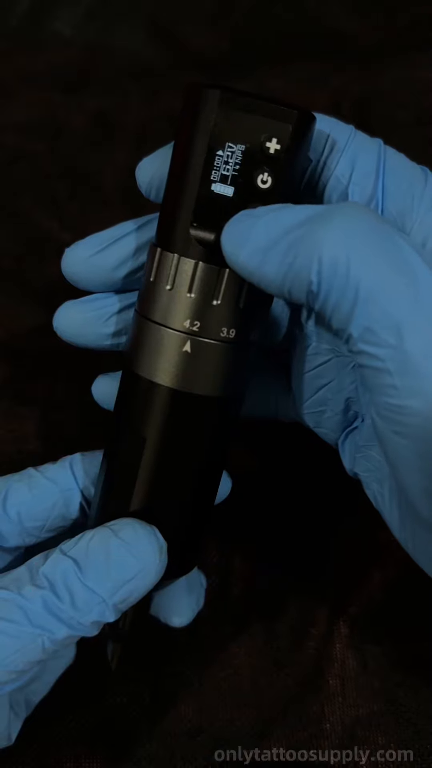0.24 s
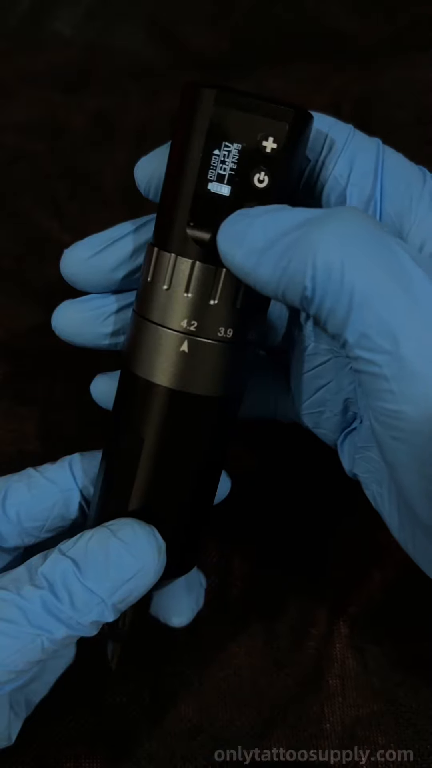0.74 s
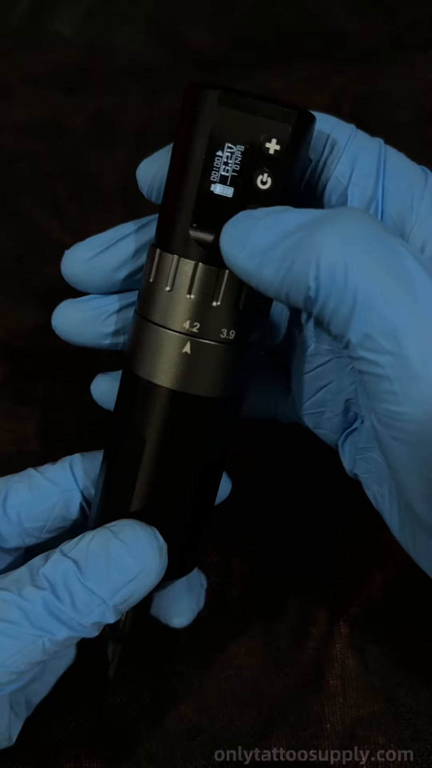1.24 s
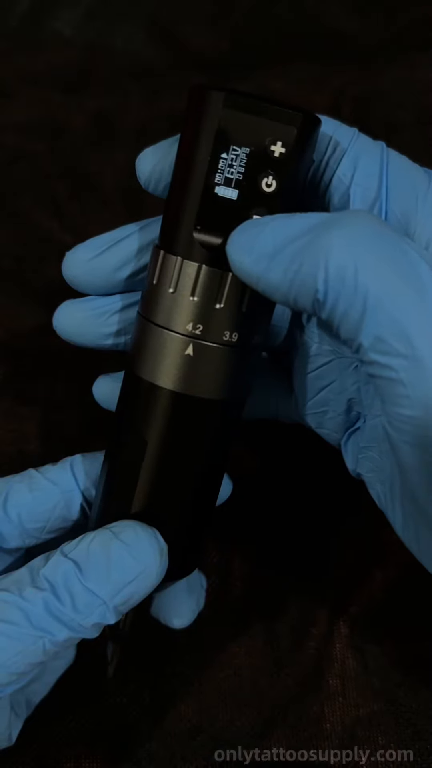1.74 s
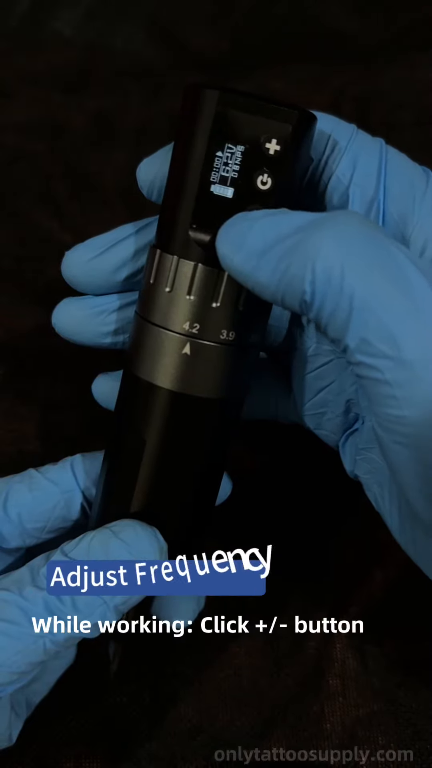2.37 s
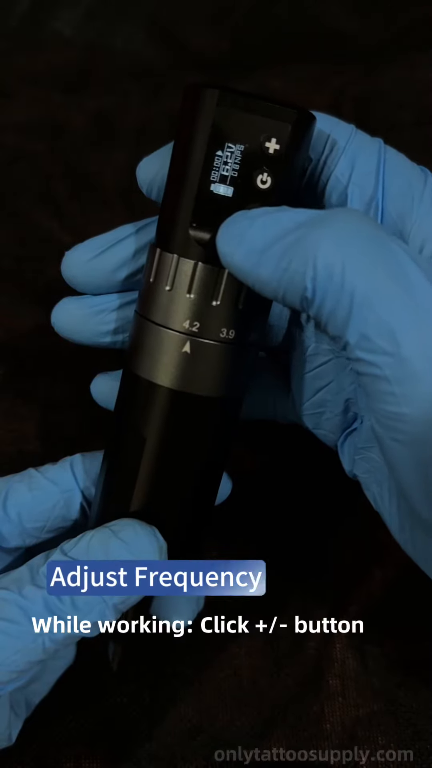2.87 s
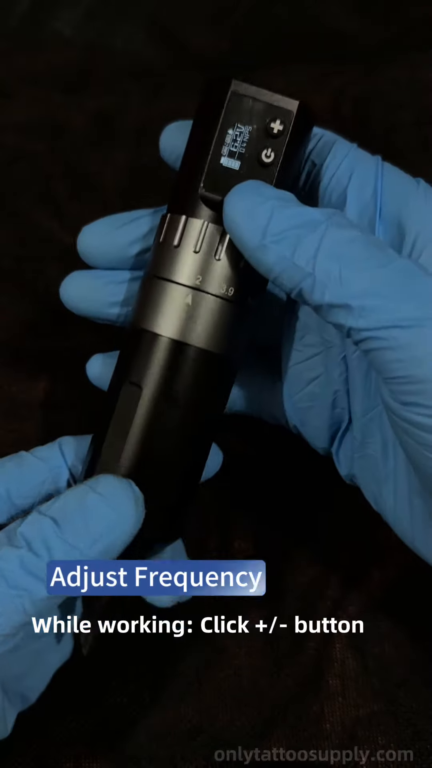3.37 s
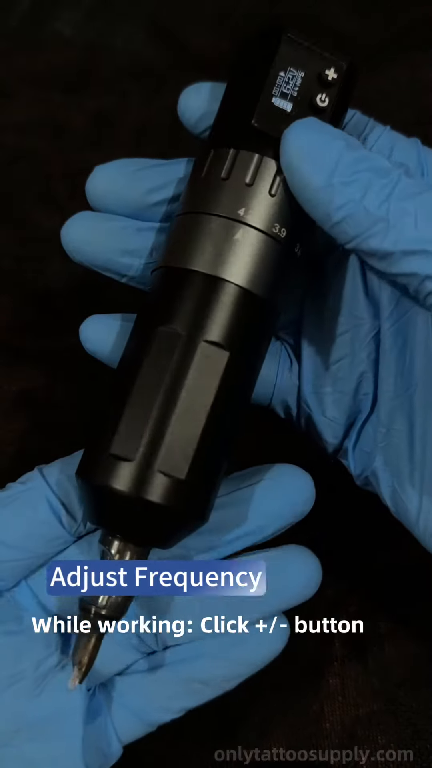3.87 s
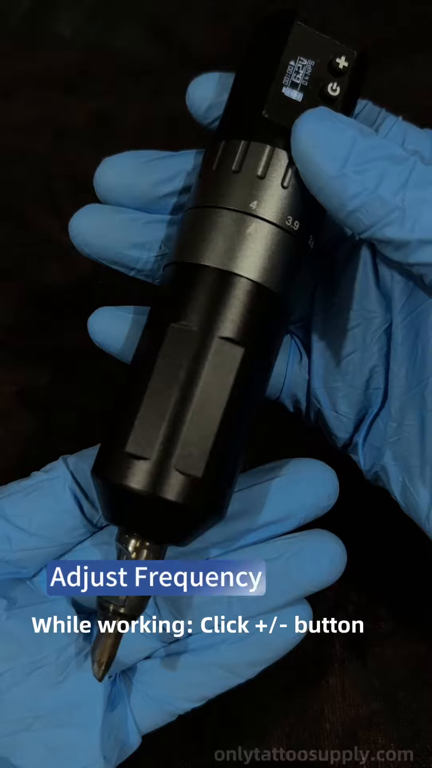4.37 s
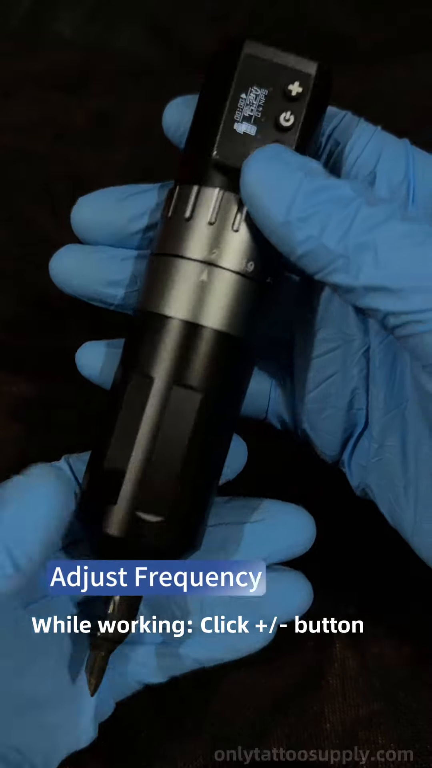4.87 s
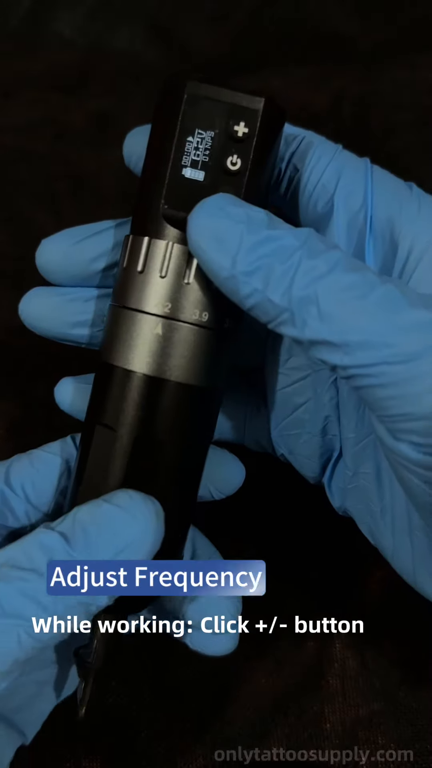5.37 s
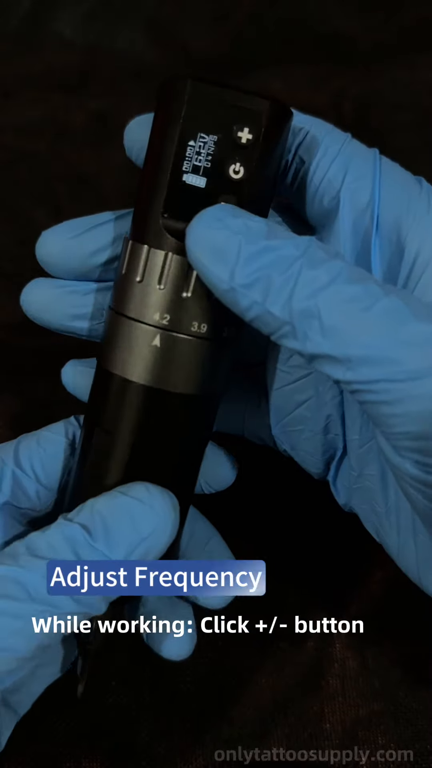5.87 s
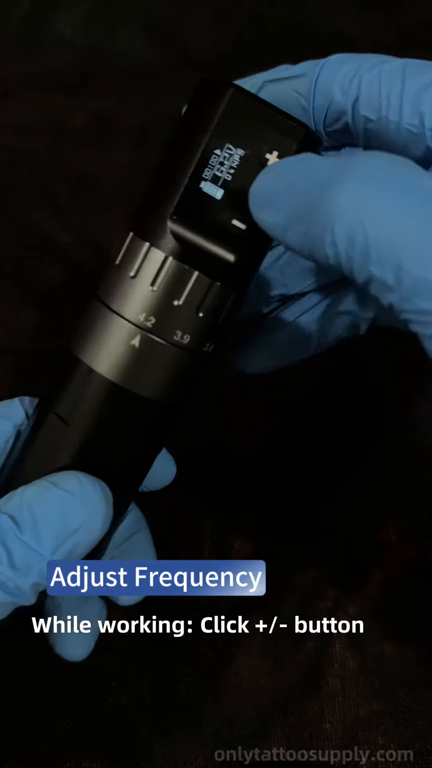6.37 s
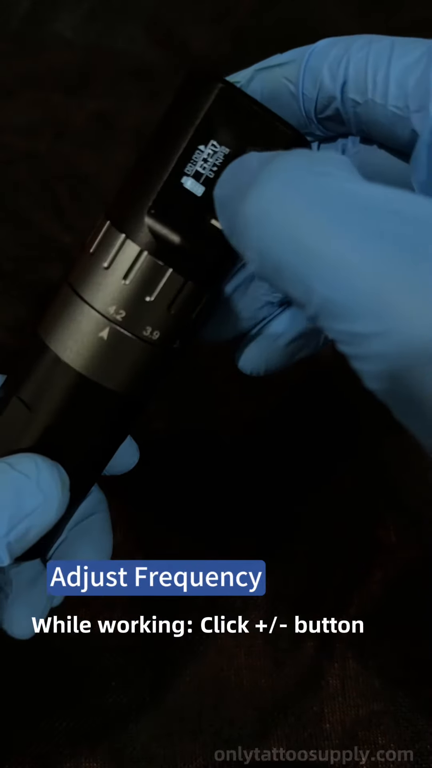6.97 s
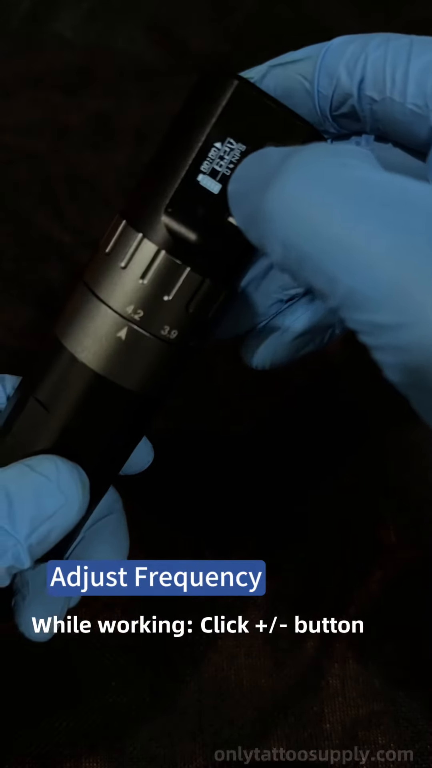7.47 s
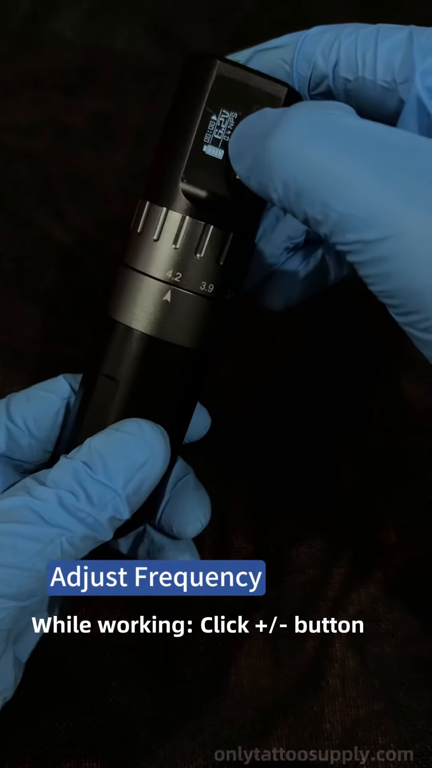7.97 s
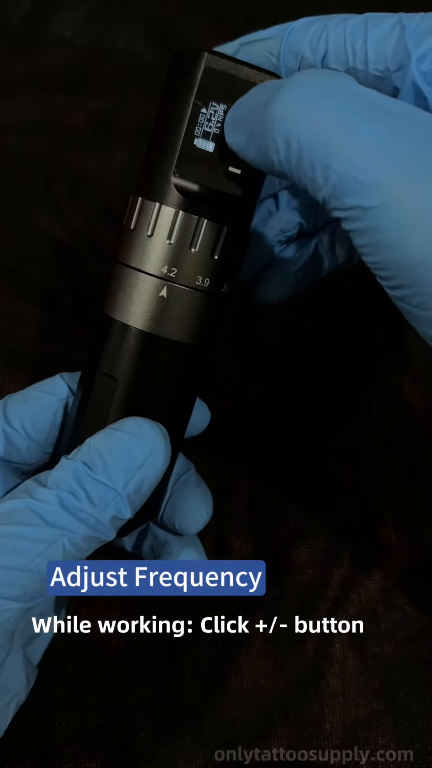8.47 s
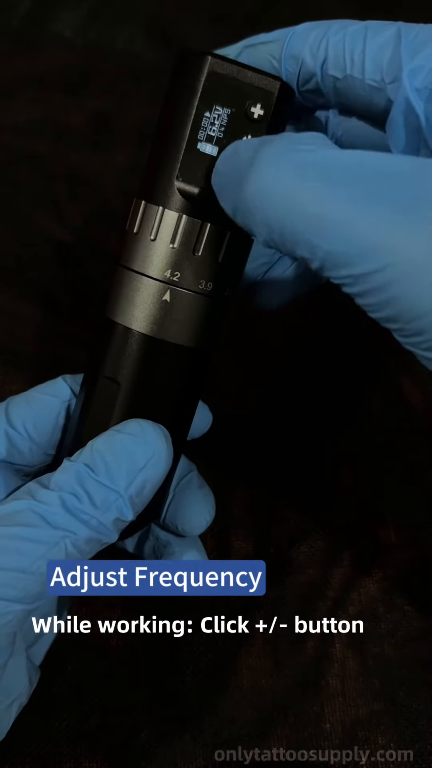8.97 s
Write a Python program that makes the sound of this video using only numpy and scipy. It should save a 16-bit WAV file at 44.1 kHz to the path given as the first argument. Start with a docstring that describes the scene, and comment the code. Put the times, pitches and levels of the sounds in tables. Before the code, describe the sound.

A small handheld motor pen buzzes in short, even quarter-second bursts, with tiny button clicks and rubber glove rustles over a faint low hum.

```python
"""A handheld rotary pen machine runs in short bursts close to the microphone; its motor turns a cam.
Each shaft turn drives the needle bar down and up, so its parts knock a few times a turn in a metal shell.
Gloved hands turn it: rubber slides as grainy noise, creases snap and its button clicks as damped sines.
A small room answers as a decaying noise tail; ventilation behind is two low hums and dull air noise."""
import sys
import numpy as np
from scipy import signal
from scipy.fft import rfft, irfft
from scipy.io import wavfile
from scipy.ndimage import map_coordinates

SR = 44100
rng = np.random.default_rng(int(sys.argv[2]) if len(sys.argv) > 2 else 0)


def attenuation_scalar(level_db):
    """Turn a level in dB into a linear amplitude multiplier (20 dB per decade)."""
    decades = np.asarray(level_db, float) / 20
    return 10 ** decades


def master_out(mix):
    """Clip the mix to full scale and print it as 16-bit PCM to the path in sys.argv[1]."""
    frames = np.transpose(np.atleast_2d(mix))
    ceiling = np.clip(frames, -1, 1)
    pcm = np.round(ceiling * 32767).astype(np.int16)
    wavfile.write(sys.argv[1], SR, pcm)


N = 407033
TIME = np.arange(N) / SR
SHAFT_HZ = 78.69  # shaft speed while the motor runs steadily


def unit(x):
    """Scales a signal to rms 1."""
    return x / np.sqrt(np.mean(x ** 2) + 1e-20)


def along(points, hz):
    """Reads (f/Hz, value) points on a log frequency axis."""
    f, value = np.transpose(points)
    return np.interp(np.log(hz + 1), np.log(f + 1), value)


def curves(rows):
    """Gives one value per sample for each column after the time."""
    s, *columns = np.transpose(rows)
    return [np.interp(TIME, s, column) for column in columns]


def wobble(rate):
    """A smooth random curve with rate knots a second."""
    knots = rng.standard_normal(int(N / SR * 60) + 4)
    return map_coordinates(knots, [TIME * np.clip(rate, 0, 59)])


def coloured(x, colour_db, size=2048):
    """Sends x through the minimum-phase filter of a colour (dB as a function of Hz), of energy 1."""
    cepstrum = irfft(np.log(attenuation_scalar(colour_db(np.fft.rfftfreq(size, 1 / SR))) + 1e-6))
    # folding the cepstrum forward in time makes the filter causal
    cepstrum[1:size // 2] *= 2
    cepstrum[size // 2 + 1:] = 0
    response = irfft(np.exp(rfft(cepstrum)))
    return signal.fftconvolve(x, response / np.linalg.norm(response))[:len(x)]


def ring(modes, seconds):
    """Sums the damped sines of a table of modes."""
    t = np.arange(int(seconds * SR)) / SR
    return sum(attenuation_scalar(db - 60 * t / t60) * np.sin(2 * np.pi * hz * t) for hz, db, t60 in modes)


def add(track, s, sound):
    """Mixes a sound in at time s, cut at the end of the track."""
    part = track[round(s * SR):][:len(sound)]
    part += sound[:len(part)]


# five ways the pen faces the microphone, each: shake level/dB, barrel gain/dB,
# barrel colour [f/Hz, level/dB per Hz], needle tube colour [f/Hz, level/dB per Hz]
POSE_LOWERED = (-59.5, -4.5, [(530, -38), (900, -17.5), (991, -9), (1080, -17), (1420, -19), (1590, -5),
                (2140, 1.5), (3040, -5.5), (3500, -0.5), (5300, -11), (6890, -47), (11700, -120)],
                [(3120, -33), (5300, -12.5), (6050, -12), (6390, -1), (7170, -8.5), (8840, -4), (9470, 1),
                (9820, -6.5), (10100, -9), (10900, -16.5), (12900, -11), (15800, -16)])
POSE_TIP_SHOWN = (-61, -9.5, [(530, -33), (900, -26), (962, -15), (1340, -20), (1610, -2), (1730, -9),
                  (3520, -9), (3820, -17), (4400, -3), (5300, -21), (6890, -43), (11700, -120)],
                  [(3120, -35), (5300, -22), (5570, -21.5), (6330, -12), (7500, -10.5), (9300, 1.5),
                  (9820, -3.5), (10400, -17.5), (11400, -26.5), (12300, -16), (12900, -8), (15800, -26)])
POSE_UPRIGHT = (-53, -2.25, [(530, -47.5), (900, -23), (999, -8.5), (1080, -21), (1280, -17.5), (1860, 0.5),
                (2340, -4.5), (2580, -2.5), (4640, -6.5), (5300, -18), (6890, -40.5), (11700, -120)],
                [(3120, -37.5), (5300, -7.5), (6690, -9.5), (7850, 1.5), (8450, -0.5), (9690, -2.5),
                (10600, -4.5), (11100, -15), (12800, -7), (13700, -11), (14200, -8.5), (14800, -6),
                (15800, -6.5)])
POSE_LEANING = (-64, -4.5, [(530, -46), (900, -38), (999, -24), (1480, -14.5), (2130, 3), (3020, -8),
                (3770, -3.5), (4240, -19.5), (4780, -0.5), (5300, -12.5), (6890, -35), (11700, -120)],
                [(3120, -27), (5300, -12.5), (5860, -5.5), (7100, -19), (7640, -5), (9380, 0.5), (9870, -4),
                (10200, -13), (11000, -20), (12600, -12), (15200, -17), (15800, -19)])
POSE_TURNED = (-60, -1.7, [(530, -44), (900, -23), (1030, -16), (1480, -22), (1610, -9.5), (2190, 0),
               (2640, -8), (3500, -2.5), (4150, -8.5), (5300, -10), (6890, -42), (11700, -120)],
               [(3120, -33), (5300, -16), (5830, -11.5), (6810, -2.5), (7430, -13), (8000, -2),
               (8680, -8.5), (9430, 4.5), (9870, -11), (11100, -20.5), (12900, -4), (14000, -11),
               (15000, -10), (15800, -8.5)])


def posed(pose):
    """Turning the pen changes its levels and colours: blends the two poses next to a place in the row."""
    poses = [POSE_LOWERED, POSE_TIP_SHOWN, POSE_UPRIGHT, POSE_LEANING, POSE_TURNED]
    place = np.clip(pose, 0, len(poses) - 1)
    shares = np.clip(1 - abs(place - np.arange(len(poses))), 0, 1)
    shake_db, barrel_db = shares @ np.array([p[:2] for p in poses])

    def colour(column):
        return lambda hz: sum(share * along(p[column], hz) for share, p in zip(shares, poses))

    return shake_db, barrel_db, colour(2), colour(3)


# contacts of the moving parts in one shaft turn: place/turns, level/dB, t60/s, size scatter/dB
CONTACTS = [(0, 0, .013, 1.5), (.12, -4, .013, 2.2), (.24, -4, .012, 2.5), (.54, -3, .011, 2),
            (.68, -10, .01, 2.5)]
UP_STROKE = 3  # row of the contact on the up-stroke


def shaft_turns(t, first, cut):
    """Counts shaft turns: the motor speeds up until just after the first knock, then slows once cut off."""
    spin_up, coast = 800, 15  # change of shaft speed, Hz per s

    def ramp(span):
        return np.maximum(span, 0) ** 2 / 2

    turns = CONTACTS[UP_STROKE][0] + (t - first) * SHAFT_HZ  # the rattle opens on an up-stroke
    return turns + spin_up * ramp(first + .01 - t) - coast * ramp(t - cut)


def contact_force(t, turns, first, cut, stop):
    """Each contact knocks and dies away once a turn, over the sliding of the bearings."""
    slack_s, slack_db = 0.015, -15.5  # near the end all but the up-stroke fade this fast and this far
    late_s = 0.00026  # spread of the knocks' lateness
    number = np.floor(turns).astype(int) + 10
    chance = rng.standard_normal((60, len(CONTACTS), 2))
    force = attenuation_scalar(np.interp(t, [cut, stop], [-16, -30]))  # sliding bearings between the knocks
    for k, (place, db, t60, scatter_db) in enumerate(CONTACTS):
        if k != UP_STROKE:
            db = db + np.interp(t, [stop - 2 * slack_s, stop - slack_s], [0, slack_db])
        for back in (0, 1):  # a knock rings on into the next turn
            late, size = chance[number - back, k].T
            since = (turns % 1 + back - place) / SHAFT_HZ - late_s * abs(late)
            sounding = (since >= 0) * (t - since > first - .001)
            force += sounding * attenuation_scalar(db + scatter_db * size - 60 * np.abs(since) / t60)
    return force


def drive_level(t, first, cut, stop):
    """The level in dB of a run as it starts, holds, knocks at the stop and coasts."""
    opening = first + np.array([-.02, -.017, -.0005, 0, .012])
    moments = np.append(opening, [cut, stop - .025, stop, stop + 0.0034, stop + 0.033, stop + 0.082])
    return np.interp(t, moments, [-60, -11, -3, -5, -1.5, -1.5, -1.0, 2.0, -18.5, -18, -36])


def cam_noise(turns):
    """Cam and bearings meet nearly alike on every turn, which draws lines at the shaft multiples."""
    pattern = rng.standard_normal(561)[(turns % 1 * 561).astype(int)]
    pattern = signal.sosfilt(signal.butter(4, 1400, "high", fs=SR, output="sos"), pattern)
    return np.sqrt(.5) * pattern + np.sqrt(.5) * rng.standard_normal(len(turns))


# needle tube modes that briefly outlast a knock: f/Hz, level/dB, t60/s
TUBE_MODES = [(9520, -30, 0.01), (9300, -52, 0.074), (12600, -36, .008)]


def needle_treble(needle, hiss):
    """The needle's rattle rings its tube; above 11 kHz air and brush hiss take over."""
    dull = signal.butter(4, 11000, fs=SR, output="sos")
    treble = signal.sosfilt(dull, needle) + hiss - signal.sosfiltfilt(dull, hiss)
    return treble + signal.fftconvolve(needle, ring(TUBE_MODES, 0.095))[:len(needle)]


# the barrel's close pair of long modes: f/Hz, level/dB, t60/s
BARREL_MODES = [(2198, -28, .55), (2213, -35, .5)]


def barrel_ring(feed):
    """The metal barrel rings long on two close modes."""
    return signal.fftconvolve(feed, ring(BARREL_MODES, 0.58))[:len(feed)]


# steady motor tones: multiple of the shaft speed, peak level/dB
MOTOR_TONES = [(2, -66), (3, -68), (7, -71.5), (9, -76.5), (12, -70), (13, -65.5), (21, -70.5), (24, -62),
               (26, -65), (32, -62)]


def motor_tones(turns):
    """The motor sings at multiples of the shaft speed, each from a random phase."""
    return sum(attenuation_scalar(db) * np.sin(2 * np.pi * (order * turns + rng.random())) for order, db in MOTOR_TONES)


def burst(first, length, rattle_db, ring_db, pose):
    """One run of the motor: spin-up whir, steady rattle, then a few coasting knocks."""
    stop, begin = first + length, max(first - .035, 0)
    cut = stop - .045  # the current ends before the bar stops knocking
    shake_db, barrel_db, barrel_colour, tube_colour = posed(pose)
    t = begin + np.arange(int((stop + .1 - begin) * SR)) / SR
    turns = shaft_turns(t, first, cut)
    force = contact_force(t, turns, first, cut, stop)
    level = attenuation_scalar(rattle_db - 1.5 + drive_level(t, first, cut, stop))
    steady = (t > first + .012) & (t < cut)

    def played(shape):
        """Levels a signal by its steady part and leaves room for ringing."""
        return np.pad(shape * level / np.sqrt(np.mean(shape[steady] ** 2)), (0, SR // 2))

    cam = played(force ** .9 * cam_noise(turns))
    # the needle rattles anew on each turn; the hiss follows the knocks less
    needle = played(force * rng.standard_normal(len(t)))
    hiss = played(force ** .5 * rng.standard_normal(len(t)))
    rattle = attenuation_scalar(barrel_db) * coloured(cam, barrel_colour)
    rattle += coloured(needle_treble(needle, hiss), tube_colour)
    # the 28th shaft multiple lies on the barrel's modes and keeps them ringing
    feed = played(force * np.sin(2 * np.pi * 28 * turns))
    rattle += attenuation_scalar(ring_db) * barrel_ring(feed)
    # the off-centre cam shakes the whole pen, also while it coasts
    shake = attenuation_scalar(shake_db) * np.sin(2 * np.pi * turns)
    shake_fade = np.interp(t, [first - .03, first + .015, cut, stop + .06], [0, 1, 1, 0])
    tone_fade = np.interp(t, [first - .024, first + 0.014, cut, stop], [0, 1, 1, 0])
    add(rattle, 0, shake_fade * shake)
    add(rattle, 0, tone_fade * motor_tones(turns))
    return begin, rattle


# motor bursts: first knock t/s, length/s, rattle level/dB ahead of the drive curve,
# long ring gain/dB, pose (place in the row of poses; a fraction blends two)
MOTOR_BURSTS = [(-.1349, 0.26, -38.5, -53.5, 2), (0.4958, 0.23, -39, -52, 2), (1.1124, .2216, -39, -56, 2),
                (1.7401, 0.24, -39.5, -54, 2), (2.3806, 0.24, -39.5, -55, 2),
                (3.0576, 0.26, -39, -54, 2.45), (3.7466, 0.25, -34.5, -59, 1), (4.4339, 0.25, -35, -61, 1),
                (5.1232, 0.25, -38, -54.5, 0), (5.812, 0.25, -40, -44.5, 3.5),
                (6.5005, 0.25, -36.5, -51, 3), (7.189, 0.25, -36.5, -51, 3), (7.878, 0.26, -40, -47.5, 4),
                (8.566, 0.25, -40, -47, 3.8)]


def pen():
    """The machine close to the microphone, run after run."""
    track = np.zeros(N)
    for row in MOTOR_BURSTS:
        add(track, *burst(*row))
    return track


# how long the small room holds each frequency: f/Hz, t60/s
ROOM_DECAY = [(500, 0.29), (3000, 0.41), (10000, 0.18)]


def room(x):
    """Walls answer after a short gap: two slaps in a noise tail dying at its own speed for each frequency."""
    hz, t, z = signal.stft(rng.standard_normal(SR // 2), SR, nperseg=256)
    tail = signal.istft(z * attenuation_scalar(-60 * t / along(ROOM_DECAY, hz)[:, None]), SR, nperseg=256)[1]
    tail /= np.linalg.norm(tail)
    tail[[0, int(.007 * SR)]] = attenuation_scalar([-12, -12])  # the slaps, 7 ms apart
    return signal.fftconvolve(np.pad(x, (int(.0146 * SR), 0)), tail)[:N]


# two hums close in pitch, the first wandering and then rising, the second sinking: t/s, f/Hz, rms level/dB
WANDERING_HUM = [(0.0, 44.331, -56.0), (1.0, 46.053, -64.8), (2.0, 44.034, -65.4), (3.0, 43.969, -56.5),
                 (4.0, 43.982, -70.2), (5.0, 44.312, -53.0), (6.0, 45.205, -54.6), (7.2, 46.164, -58.3),
                 (8.2, 47.019, -61.2), (9.23, 47.523, -62.9)]
SINKING_HUM = [(0.0, 44.0, -71.0), (4.6, 43.595, -56.9), (9.23, 42.817, -71.0)]
# colour of the air noise: f/Hz, level/dB per Hz
AIR_COLOUR = [(32, -22), (55, -1), (77, -11.5), (115, -17), (189, -14.5), (319, -18.5), (367, -15.5),
              (444, -20), (524, -23), (1090, -22.5), (1930, -28.5), (2400, -34), (8430, -50), (14200, -62),
              (16000, -44)]
# level of the air noise: t/s, level/dB
AIR_LEVEL = [(0, -62), (3.9, -60), (5, -61.5), (8.1, -59), (9.23, -59.5)]


def ventilation():
    """Behind the hands, two low hums beat against each other over dull air noise."""

    def hum(hz, db):
        phase = 2 * np.pi * np.cumsum(hz) / SR
        return np.sqrt(2) * attenuation_scalar(db + 0.74 * wobble(6)) * np.sin(phase)

    air = unit(coloured(rng.standard_normal(N), lambda hz: along(AIR_COLOUR, hz), size=16384))
    air_level = attenuation_scalar(curves(AIR_LEVEL)[0] + 0.66 * wobble(2.925))
    return hum(*curves(WANDERING_HUM)) - hum(*curves(SINKING_HUM)) + air_level * air


# level of the gloves sliding: t/s, level/dB
RUB_LEVEL = [(0, -80.5), (3.3, -76.5), (3.46, -59), (3.62, -59), (3.7, -68.5), (4.0, -68), (4.4, -76),
             (4.8, -69.5), (4.94, -69.5), (4.97, -64.5), (5.12, -61), (5.55, -71.5), (5.8, -62.5),
             (6.3, -76.5), (7.6, -85.5), (7.66, -60), (7.73, -63.5), (7.82, -78), (9.23, -83.5)]
# colour of sliding rubber: f/Hz, level/dB per Hz
RUBBER_COLOUR = [(1180, -42.5), (2000, -2), (4010, 1), (5680, 1), (8190, -2), (11700, -7), (13900, -3),
                 (16000, -7.5)]


def glove_rub():
    """Rubber sticks and slides in fine grains: noise with a fast random level."""
    grains = rng.standard_normal(N) * attenuation_scalar(2.8 * wobble(40) + 0.99 * wobble(17))
    return attenuation_scalar(curves(RUB_LEVEL)[0]) * unit(coloured(grains, lambda hz: along(RUBBER_COLOUR, hz)))


# glove creases that snap: t/s, level/dB, f/Hz
CREASE_SNAPS = [(1.385, -51, 2740), (2.0, -42, 3000), (3.496, -41.5, 3880), (3.6104, -49, 5150),
                (3.6878, -52, 2696), (4.819, -52.5, 2744), (5.4607, -48, 6360), (6.15, -56, 4000),
                (6.183, -49.5, 6700), (6.3607, -55.5, 3340), (8.153, -47, 3290), (8.949, -59, 13500)]


def glove_snaps():
    """A crease springs back: a short damped sine with a noisy crack."""
    track, t = np.zeros(N), np.arange(SR // 10) / SR
    for s, db, hz in CREASE_SNAPS:
        crack = .8 * attenuation_scalar(-60 * t / 0.0052) * rng.standard_normal(len(t))
        add(track, s, attenuation_scalar(db) * (ring([(hz, 0, .008)], len(t) / SR) + crack))
    return track


# the pen's one bump as it changes grip: t/s, level/dB, t60/s
GRIP_BUMP = (3.199, -35.5, 0.06)
# colour of the bump: f/Hz, level/dB per Hz
BUMP_COLOUR = [(120, -26), (220, -2), (700, -1.5), (1100, 0), (1500, 6), (2200, -23)]


def grip_bump():
    """The pen bumps dully as it changes grip: one decaying burst of noise."""
    track, t = np.zeros(N), np.arange(SR // 10) / SR
    s, db, t60 = GRIP_BUMP
    envelope = attenuation_scalar(db - 60 * t / t60) * (1 - np.exp(-t / 0.0027))
    thud = envelope * rng.standard_normal(len(t))
    add(track, s, coloured(thud, lambda hz: along(BUMP_COLOUR, hz)))
    return track


# modes of the button dome: f/Hz, level/dB before scatter, t60/s
DOME_MODES = [(2490, -4.5, 0.0027), (3940, -4, 0.0021), (4420, -7, 0.0027), (5350, -5.5, 0.0027),
              (6100, -5.5, 0.0016), (7600, -16, 0.00085), (9870, -12, 0.0013), (13830, -18, 0.0021)]
# when the button is pressed, and when it is let go: t/s
PRESS_TIMES = [0.2886, 0.5221, .7686, 1.0066, 2.1295, 2.378, 2.6187, 2.8673]
LET_GO_TIMES = [.168, .4287, .9094, 2.2707, 2.7566, 2.9885]


def button():
    """The dome snaps, rebounds twice against the cap and leaves a short crackle; weaker when let go."""
    track, t = np.zeros(N), np.arange(SR // 100) / SR
    # t/s, click gain/dB, level/dB of its low knock within the click
    clicks = [(s, -28, -7) for s in PRESS_TIMES] + [(s, -35, -25.5) for s in LET_GO_TIMES]
    for s, db, knock_db in clicks:
        modes = [(hz, level + rng.normal(0, 1.5), t60) for hz, level, t60 in DOME_MODES]
        modes.append((1960, knock_db, 0.0033))
        crackle = attenuation_scalar(-15.0 - 60 * t / 0.0092) * rng.standard_normal(len(t))
        snap = ring(modes, .01) * (1 - np.exp(-t / .0001)) + crackle
        for late, rebound_db in [(.0003, -2), (.0009, 4), (.0015, -16.5)]:
            add(track, s + late, attenuation_scalar(db + rebound_db) * snap)
    return signal.sosfilt(signal.butter(2, 1100, "high", fs=SR, output="sos"), track)


def scene():
    """Pen and hands close to the microphone, room and ventilation behind."""
    near = pen() + glove_rub() + glove_snaps() + grip_bump() + button()
    return (near + attenuation_scalar(-18.5) * room(near) + ventilation())[None]


def roll_off(x):
    """The treble ends steeply here."""
    return signal.sosfilt(signal.butter(12, 16800, fs=SR, output="sos"), x)


def record(dry):
    """The recorder's low-pass cuts the top treble, 35 dB down from 16.1 kHz."""
    narrow = signal.sosfilt(signal.cheby2(12, 35, 16100, fs=SR, output="sos"), dry)
    return roll_off(narrow)


dry = scene()
out = record(dry)
master_out(out)
```